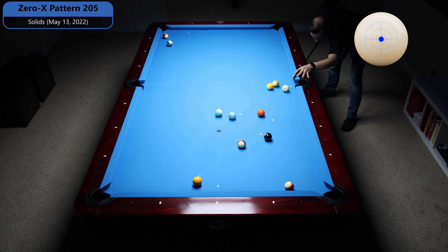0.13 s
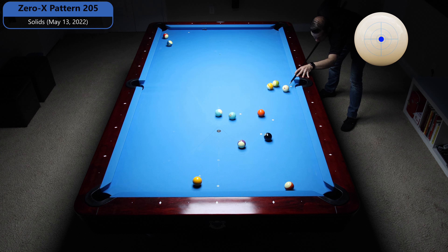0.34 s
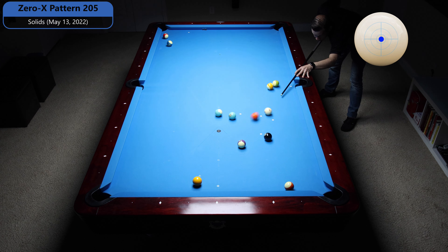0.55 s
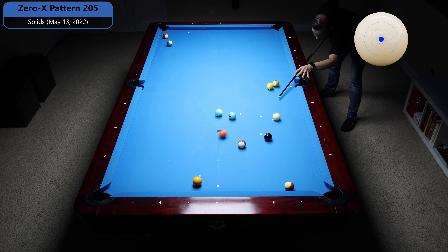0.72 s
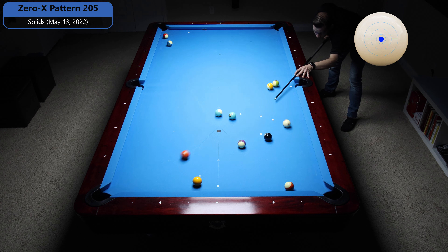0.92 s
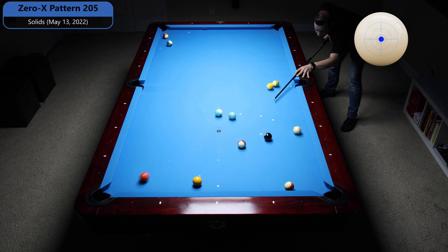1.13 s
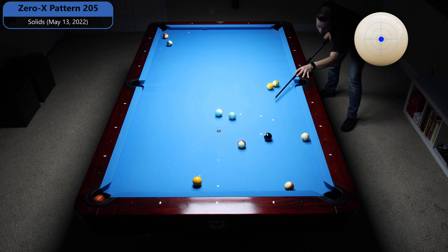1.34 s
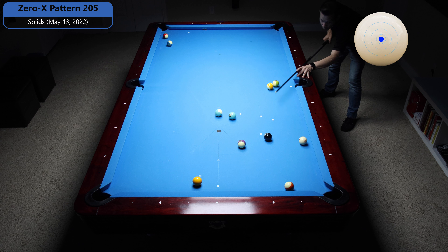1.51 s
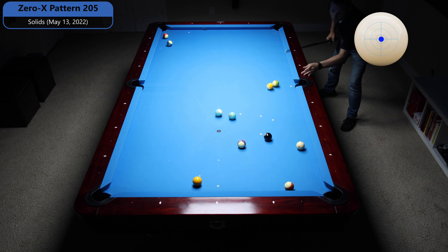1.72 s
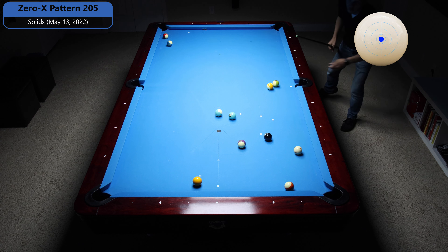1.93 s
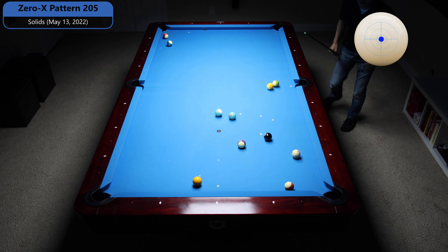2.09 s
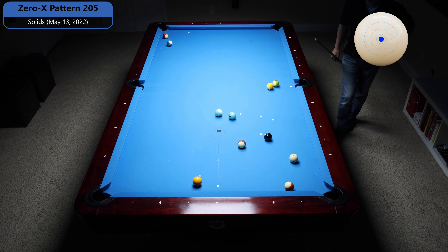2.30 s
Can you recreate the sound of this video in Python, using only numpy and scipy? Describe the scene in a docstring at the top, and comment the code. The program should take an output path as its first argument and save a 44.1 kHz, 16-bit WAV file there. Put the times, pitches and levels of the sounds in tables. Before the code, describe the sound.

Pool balls in a small live room: soft cue tip strike, hard bright clack, barely audible rolling, then a padded pocket thump, hollow clicks and woody knocks quickly settling over low hum and faint hiss, in mono.

```python
"""A shot on a pool table

In a quiet room the cue tip thuds on the cue ball, which clacks into another ball. A ball rolls over the cloth,
brushes a cushion, thumps into a corner pocket and clicks against the balls lying there until it settles.
Contacts are short shaped pulses, rubbing is noise, and wood rings as fading sines. Echoes and a dense tail
answer every contact; a low hum, rumble and hiss lie underneath."""
import sys
import numpy as np
from scipy import signal
from scipy.fft import rfft, irfft, next_fast_len
from scipy.io import wavfile
from scipy.ndimage import uniform_filter1d

SR = 44100
rng = np.random.default_rng(int(sys.argv[2]) if len(sys.argv) > 2 else 0)


def digitize_waveform(pressure):
    """Quantize a signal to 16-bit integers and store it at the path in sys.argv[1].

    Rows of a 2-D input are taken as channels; values are limited to [-1, 1].
    """
    field = np.atleast_2d(pressure).T
    bounded = np.clip(field, -1, 1)
    quanta = np.round(bounded * 32767).astype(np.int16)
    wavfile.write(sys.argv[1], SR, quanta)


N = 103767
TIME = np.arange(N) / SR  # s

# Contacts: moment and peak of the direct pulse [t/s, level/dB]
# leather tip on the cue ball
CUE_STROKE = [(0.4846, -8.5)]
# cue ball on object ball
BALL_HIT = [(0.6352, 0.5)]
# ball on the cushion
CUSHION_TOUCH = [(1.3685, -34)]
# ball on the pocket's jaw and liner
POCKET_THUMPS = [(1.4855, -9.5), (1.4935, -6.5), (1.502, -11.5), (1.517, -23)]
# balls on the pocket's wall
POCKET_KNOCKS = [(1.5562, -13.5), (1.575, -11), (1.7285, -17), (1.887, -29.5)]
# dull bumps as the balls roll to rest
SETTLING_BUMPS = [(1.925, -37), (1.979, -38), (2.028, -46.5), (2.088, -64)]
# ball on ball in the pocket, level before the rings and the treble cut [t/s, level/dB, f/Hz]
POCKET_CLICKS = [(1.5557, -6.5, 2780), (1.7280, -12, 2396), (1.8451, -23, 2280), (1.8637, -24, 2420),
                 (1.886, -23, 2250), (1.8993, -34, 2360), (1.9148, -34, 2400), (1.974, -38.5, 2060)]

# Rubbing: start, level before the swell and fade, decay time [t/s, level/dB, decay/s]
# the chalked tip grips the ball
CHALK_SCUFFS = [(0.4855, -39, 0.0068)]
# the ball scuffs the liner and the other balls
POCKET_SCUFFS = [(1.484, -35.5, 0.0058), (1.556, -36.5, 0.0069), (1.618, -39, 0.0043),
                 (1.728, -46.5, 0.011), (1.845, -51.5, 0.0056), (1.887, -64, 0.01), (1.917, -50, .004)]

# Colours: how strong each pitch region is, only the shape counts [f/Hz, level/dB]
# the contacts: tip, ball, cushion, thump, click, knock, bump
CUE_COLOUR = [(25, -46), (60, -30), (170, -2), (320, -2), (700, -4.5), (1100, -14), (1700, -23.5),
              (2600, -33), (4000, -48.5), (8000, -63)]
BALL_COLOUR = [(30, -60.5), (100, -33.5), (300, -18.5), (700, -13.5), (1100, -7), (1600, -3), (2100, 2),
               (2800, -3), (3500, -8), (4250, -21), (4950, -36), (7000, -35.5), (10500, -48.5),
               (15000, -67)]
CUSHION_COLOUR = [(80, -0.5), (230, 5.5), (550, -12.5), (1200, -17.5), (1800, -34), (5000, -56.5)]
THUMP_COLOUR = [(25, -62), (70, -55.5), (180, -24.5), (310, -1.5), (550, -5), (800, -4), (1200, -13.5),
                (1700, -25.5), (2800, -47.5), (6000, -83)]
CLICK_COLOUR = [(40, -27), (200, -28.5), (700, -14.5), (1130, -11), (1500, -9.5), (1820, 1), (2400, -3.5),
                (3000, 1), (3700, 0.5), (4400, -14), (8000, -24)]
KNOCK_COLOUR = [(25, -35), (70, -1), (170, -12), (340, -0.5), (520, -4.5), (750, -12), (1100, -3.5),
                (1700, -16), (4000, -60), (9000, -76)]
BUMP_COLOUR = [(25, -35), (80, -33.5), (200, -7), (310, 12), (430, -7.5), (570, 11.5), (850, -6),
               (1300, -41), (4000, -46)]
# the noises: chalk, pocket liner, rolling on cloth, background
CHALK_COLOUR = [(500, -19.5), (1500, 2), (3000, 3.5), (4500, -9.5), (7600, -10), (9500, -28.5),
                (15000, -36.5)]
LINER_COLOUR = [(600, -24), (2000, 8.5), (3000, 2), (5200, -1), (8000, -8), (11000, -15), (15000, -27)]
ROLL_COLOUR = [(40, -23), (80, 12), (150, -3.5), (235, 6), (320, -10.5), (480, -28), (1200, -40),
               (4000, -60)]
FLOOR_COLOUR = [(20, -10), (40, -10), (75, 3.5), (125, 1), (175, -10), (300, -19), (600, -26.5),
                (1500, -30.5), (4000, -34), (15000, -37)]

# Ringing tones, levels relative to each other, time to fade by 60 dB [f/Hz, level/dB, t60/s]
# cue and table bed
CUE_MODES = [(180, -25, .5), (228, -29, .45), (303, -20, .38), (378, -21, .38), (537, -26, .33),
             (863, -27, .25)]
# pocket and its wooden rail
POCKET_MODES = [(182.2, -25, 1), (291.7, -11, 0.28), (331, -9, 0.13), (372.6, -21, 0.36), (427, -13, 0.36),
                (540, -8.5, 0.18), (679.4, -13, 0.26), (720, -17.5, 0.14), (788, -16.5, 0.35),
                (1094, -36.5, 0.31), (1170, -23.5, 0.2)]

# First echoes from ceiling and walls: delay, level relative to each other [t/s, level/dB]
MID_TABLE_ECHOES = [(.00135, -10), (.0080, -5), (.0132, -13), (.0210, -13), (.0237, -9)]
CORNER_ECHOES = [(.0085, -20.5), (0.0125, -8.5), (.0192, -7.5), (.0230, -9.5)]
# time for the room's tail to fade by 60 dB [f/Hz, t60/s]
ROOM_T60 = [(100, .7), (250, 0.62), (500, 0.43), (1000, 0.33), (2500, 0.35), (5000, 0.38), (12000, 0.27)]

ROOM_GAP_S, ROOM_BUILD_S = 0.00067, 0.0059  # wait before the tail; base of its build-up time
BASS_BUILD_HZ, WALL_CUT_HZ = 510, 6600  # slower build-up toward the bass; treble cut of the echoes
CLICK_RING_DB, CLICK_WIDTH_HZ = 4, 210
CLICK_EDGE_RATIO = 1.187  # treble cut as a multiple of the click's pitch
HOLLOW_HZ, HOLLOW_WIDTH_HZ, HOLLOW_DB = 1150, 194, 13.5
ROLL_DB, ROLL_START_S, ROLL_FADE_S = -51, 0.84, 0.1
ROLL_END_S = 1.3  # the fade-out begins here
FLOOR_DB, HUM_HZ, HUM_DB = -51, 107.6, -55.5
HUM_WAVER = 0.76  # rms of the waver as a share of the hum's height
CUTOFF_HZ = 15800


def ball_clack():
    """Two hard balls touch very briefly, so the direct sound is one short pulse and the room adds the length."""
    return room(contacts(BALL_HIT, BALL_COLOUR), MID_TABLE_ECHOES, echo_db=0.5, tail_db=2.5)


def cue():
    """The soft tip gives a dull thud, its chalk scuffs, and the cue and table ring briefly."""
    thud = room(contacts(CUE_STROKE, CUE_COLOUR), MID_TABLE_ECHOES, echo_db=-4.5, tail_db=2)
    chalk = room(scuffs(CHALK_SCUFFS, CHALK_COLOUR), MID_TABLE_ECHOES, echo_db=5, tail_db=5)
    return thud + chalk + body(CUE_STROKE, CUE_MODES, ring_db=-1)


def pocket_entry():
    """The ball thumps into the padded pocket and rubs; the strongest thump makes the rail boom."""
    thumps = room(contacts(POCKET_THUMPS, THUMP_COLOUR), CORNER_ECHOES, echo_db=-1.5, tail_db=6.0)
    rub = room(scuffs(POCKET_SCUFFS, LINER_COLOUR), CORNER_ECHOES, echo_db=1.5, tail_db=-0.5)
    boom = body(POCKET_THUMPS[1:2], POCKET_MODES, ring_db=-1)
    return thumps + rub + boom


def pocket_rattle():
    """The ball clicks on the others, knocks the wall and settles; knocks and bumps ring the wood."""
    knocks = room(contacts(POCKET_KNOCKS, KNOCK_COLOUR), CORNER_ECHOES, echo_db=-9, tail_db=5.5)
    bumps = room(contacts(SETTLING_BUMPS, BUMP_COLOUR), CORNER_ECHOES, echo_db=-0.5, tail_db=5.0)
    wood = body(POCKET_KNOCKS + SETTLING_BUMPS, POCKET_MODES, ring_db=-6.5)
    return pocket_clicks() + knocks + bumps + wood


def pocket_clicks():
    """Ball on ball: each click rings at its pitch and in the pocket's hollow; a lower pitch is also duller."""
    out = 0
    hollow = signal.iirpeak(HOLLOW_HZ, HOLLOW_HZ / HOLLOW_WIDTH_HZ, fs=SR)
    for s, db, hz in POCKET_CLICKS:
        click = contacts([(s, db)], CLICK_COLOUR)
        pitch = signal.iirpeak(hz, hz / CLICK_WIDTH_HZ, fs=SR)
        click = click + from_db(CLICK_RING_DB) * signal.lfilter(*pitch, click)
        click = click + from_db(HOLLOW_DB) * signal.lfilter(*hollow, click)
        treble_cut = signal.butter(N=6, Wn=hz * CLICK_EDGE_RATIO, fs=SR, output="sos")
        click = signal.sosfilt(treble_cut, click)
        out = out + room(click, CORNER_ECHOES, echo_db=-2, tail_db=-2.0)
    return out


def rolling():
    """Rolling on cloth is a low rumble of noise; a brush with the cushion faintly rings the rail."""
    fade_in = np.clip((TIME - ROLL_START_S) / ROLL_FADE_S, 0, 1)
    fade_out = np.clip((ROLL_END_S - TIME) / ROLL_FADE_S + 1, 0, 1)
    rumble = from_db(ROLL_DB) * fade_in * fade_out * noise(ROLL_COLOUR)
    brush = room(contacts(CUSHION_TOUCH, CUSHION_COLOUR), CORNER_ECHOES, echo_db=-3, tail_db=8.5)
    return rumble + brush + body(CUSHION_TOUCH, POCKET_MODES, ring_db=-8)


def background():
    """Low rumble and faint hiss are shaped noise; the hum is a sine whose height wavers at random."""
    floor = from_db(FLOOR_DB) * noise(FLOOR_COLOUR)
    waver = 1 + HUM_WAVER * noise([(5, -1.5), (12, -15), (40, -120)])  # slow noise: [f/Hz, level/dB]
    hum = from_db(HUM_DB) * waver * np.sin(2 * np.pi * HUM_HZ * TIME)
    return floor + hum


def room(x, echoes, echo_db, tail_db):
    """The direct sound is followed by slightly dulled first echoes and a dense, fading tail."""
    walls = signal.butter(2, WALL_CUT_HZ, fs=SR)
    early = signal.lfilter(*walls, blows(echoes)[:SR] + 1e-18)
    answer = from_db(echo_db) * early + from_db(tail_db) * diffuse_tail()
    return x + signal.fftconvolve(x, answer)[:N]


def diffuse_tail(count=12):
    """One second of dense reflections: they build up, the bass last, then each band dies at its own rate."""
    t, hz = np.arange(SR) / SR, np.arange(SR // 2 + 1)
    white = rfft(rng.standard_normal(SR))
    centres = np.geomspace(100, 12000, count)
    tail = 0
    for centre, share in zip(centres, np.eye(count)):
        # each band overlaps its neighbours
        weight = at_hz(np.column_stack([centres, share]), hz)
        band = irfft(white * weight, SR)
        # smooth out the band's own random swells
        window = int(SR * max(.012, 8 / centre))
        swell = np.sqrt(uniform_filter1d(band ** 2, window) + 1e-20)
        even = band / swell * np.sqrt(np.mean(weight ** 2))
        build_s = ROOM_BUILD_S * (1 + BASS_BUILD_HZ / centre)
        build = 1 - np.exp(-np.maximum(t - ROOM_GAP_S, 0) / build_s)
        fade = np.exp(-np.log(1000) * t / at_hz(ROOM_T60, centre))
        tail = tail + even * build * fade
    return tail / np.sqrt(np.sum(tail ** 2))


def contacts(events, colour):
    """Each blow sends out one contact pulse."""
    return signal.fftconvolve(blows(events), contact_pulse(colour))[:N]


def contact_pulse(colour, size=4096):
    """The pressure pulse of a contact, peak one: its energy comes as early as its colour allows."""
    cepstrum = irfft(np.log(from_db(at_hz(colour, np.arange(size // 2 + 1) * SR / size))))
    # folding the cepstrum forward in time gives the minimum-phase pulse
    cepstrum[1:size // 2] *= 2
    cepstrum[size // 2 + 1:] = 0
    pulse = irfft(np.exp(rfft(cepstrum)))[:size // 2]
    return -pulse / np.abs(pulse).max()


def scuffs(events, colour):
    """Friction is a burst of noise that swells quickly and dies away."""
    grip = 0
    for s, db, decay in events:
        age = np.maximum(TIME - s, 0) / decay
        grip = grip + from_db(db) * (np.exp(-age) - np.exp(-10 * age))
    return grip * noise(colour)


def body(events, modes, ring_db):
    """Blows set a solid body's tones ringing; the tones alternate in sign."""
    clicks = blows(events)
    out = 0
    for k, (hz, db, t60) in enumerate(modes):
        out = out + (-1) ** k * from_db(db + ring_db) * ring(clicks, hz, t60)
    return out


def ring(clicks, hz, t60):
    """A resonator: a click of height one starts a sine that begins at height one and fades."""
    r = np.exp(-np.log(1000) / (t60 * SR))  # loss per sample
    w = 2 * np.pi * hz / SR
    return signal.lfilter([0, np.sin(w)], [1, -2 * r * np.cos(w), r * r], clicks + 1e-18)


def blows(events):
    """One single-sample click for each row of time and level."""
    clicks = np.zeros(N)
    for s, db in events:
        clicks[int(s * SR)] += from_db(db)
    return clicks


def noise(colour):
    """Steady noise of the given colour, rms one."""
    size = next_fast_len(N)
    white = rfft(rng.standard_normal(size))
    hz = np.arange(len(white)) * SR / size
    return rms_one(irfft(white * from_db(at_hz(colour, hz)), size)[:N])


def at_hz(points, hz):
    """Read a table between its rows, on a log-frequency axis."""
    f, value = np.transpose(points)
    return np.interp(np.log(np.maximum(hz, 1)), np.log(f), value)


def rms_one(x):
    """Scale to an rms of one."""
    return x / np.sqrt(np.mean(x ** 2) + 1e-20)


def from_db(db):
    """Decibels to gain."""
    return 10 ** (np.asarray(db) / 20)


def scene():
    """The whole shot, added up into one channel."""
    shot = ball_clack() + cue() + pocket_entry() + pocket_rattle() + rolling()
    return (shot + background())[None]


def record(dry):
    """High peaks are rounded off and the top treble is cut steeply."""
    rounded = dry / (1 + dry ** 8) ** (1 / 8)
    # 0.1 dB ripple below the cutoff, 80 dB down above it
    treble_cut = signal.ellip(10, .1, 80, CUTOFF_HZ, fs=SR, output="sos")
    return signal.sosfilt(treble_cut, rounded)


dry = scene()
out = record(dry)
digitize_waveform(out)
```